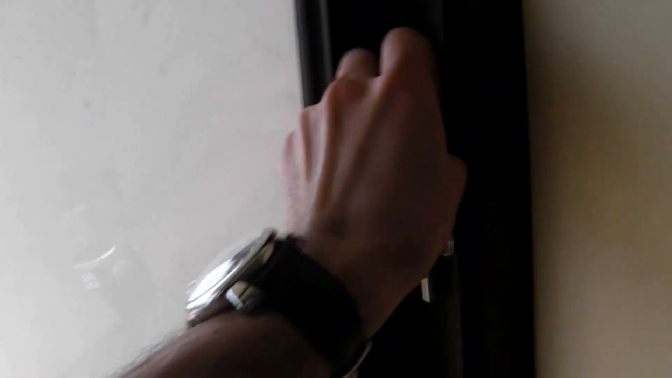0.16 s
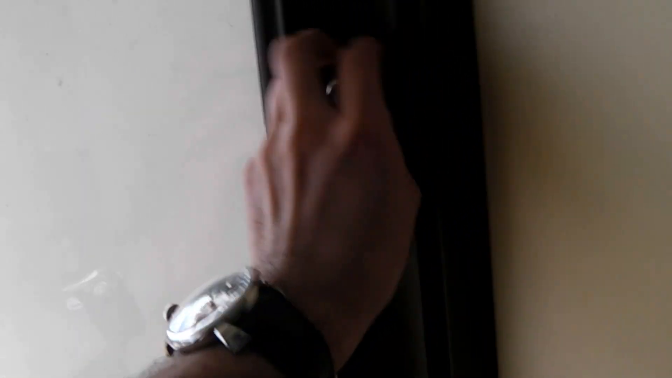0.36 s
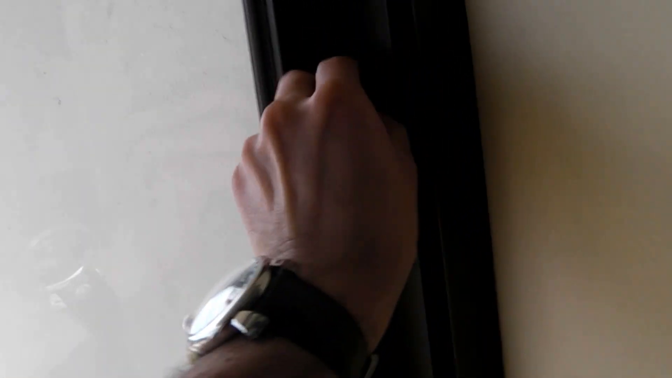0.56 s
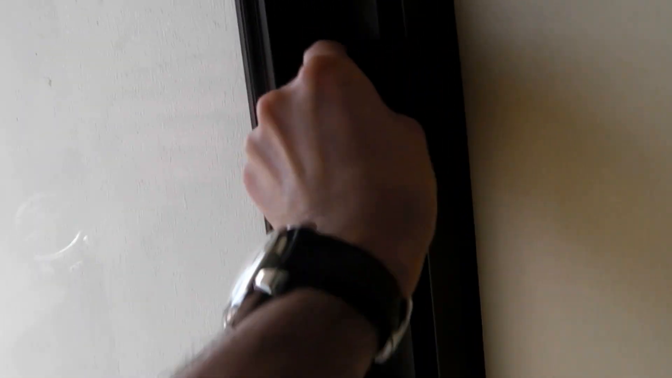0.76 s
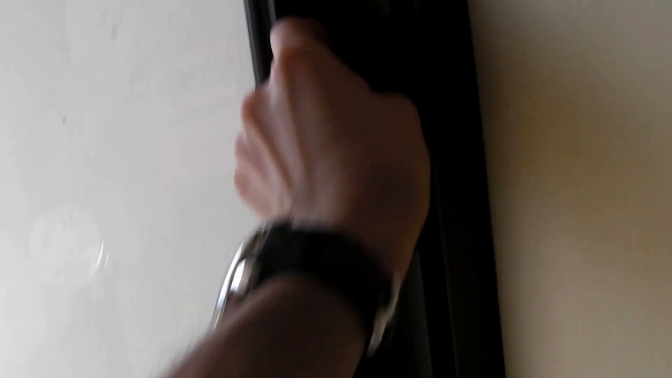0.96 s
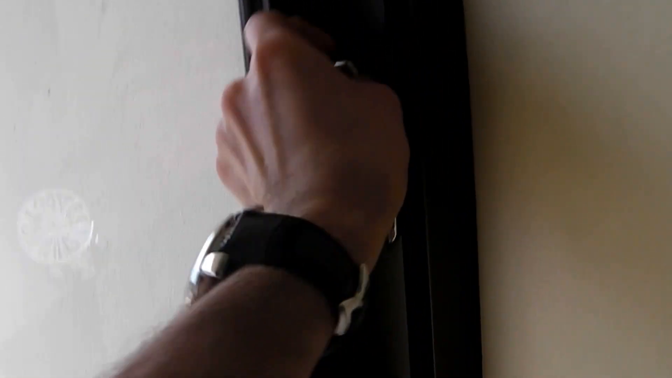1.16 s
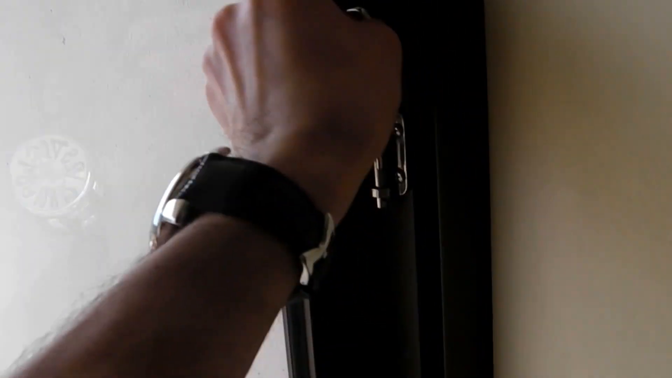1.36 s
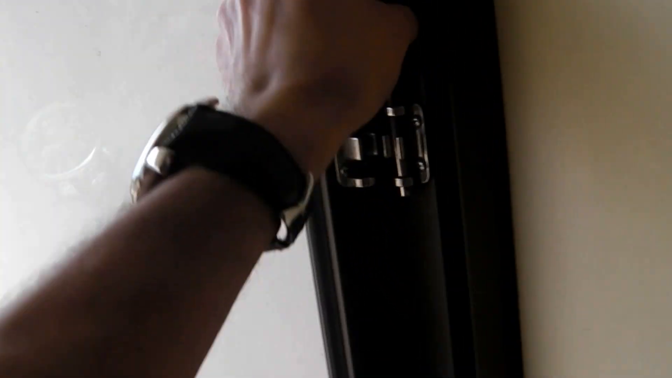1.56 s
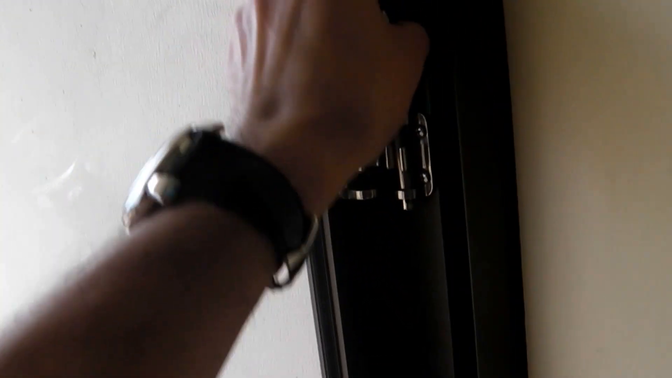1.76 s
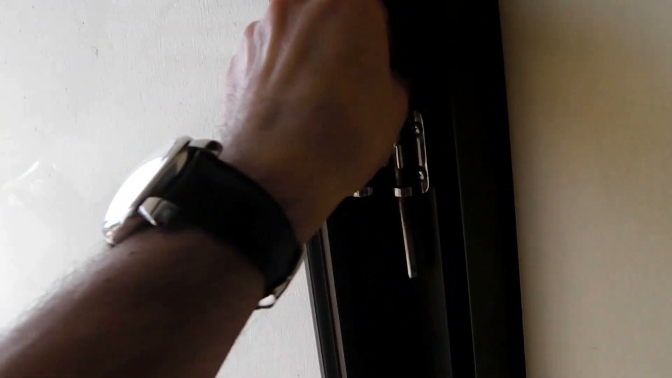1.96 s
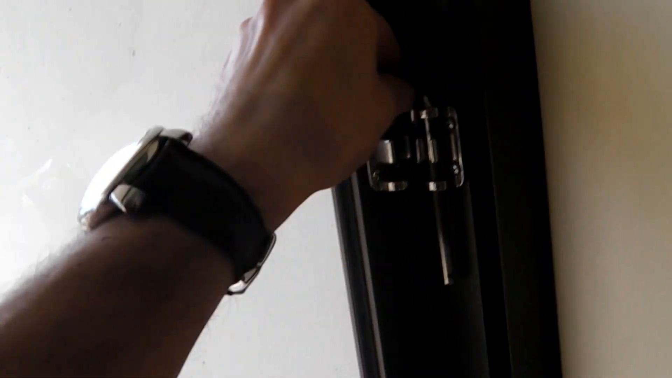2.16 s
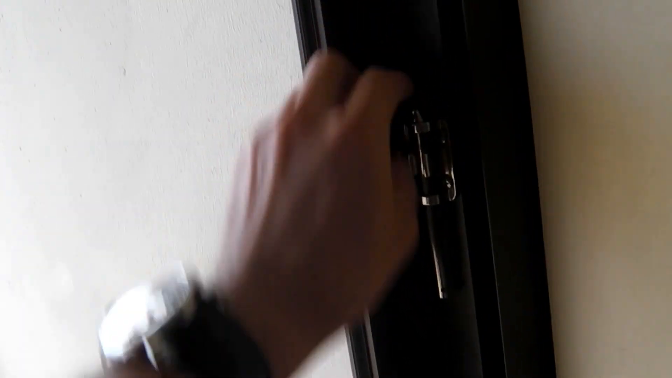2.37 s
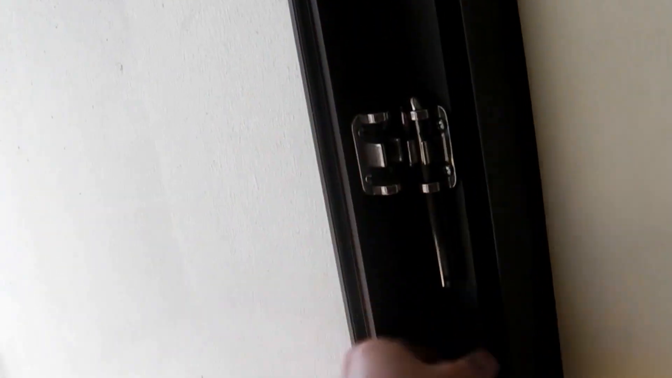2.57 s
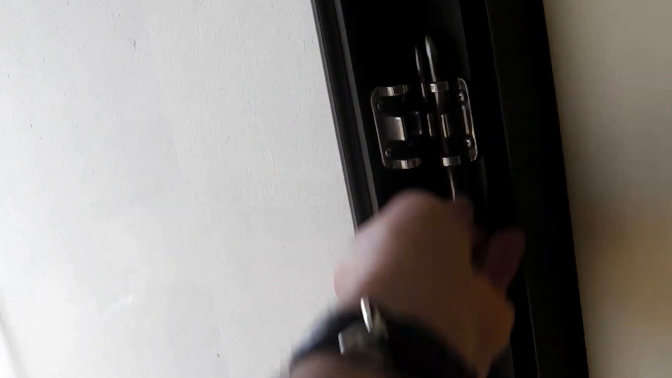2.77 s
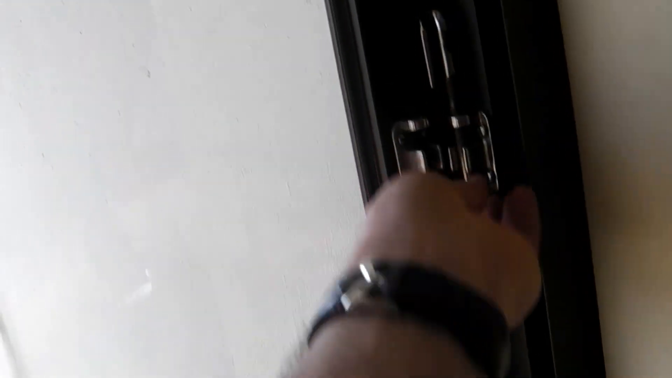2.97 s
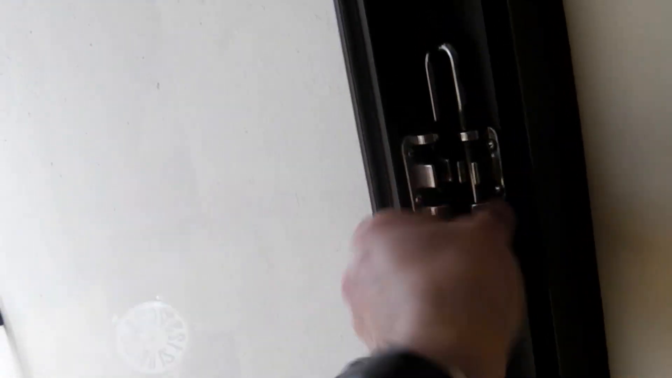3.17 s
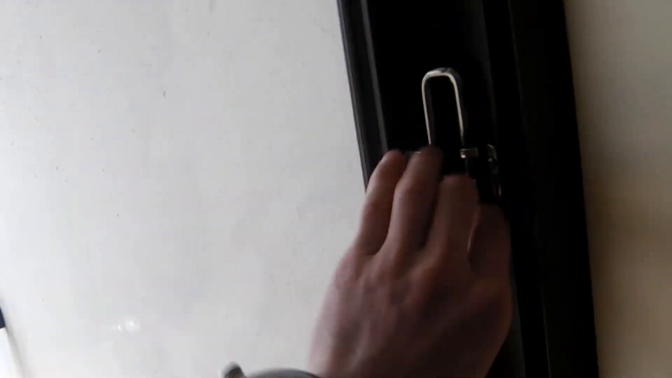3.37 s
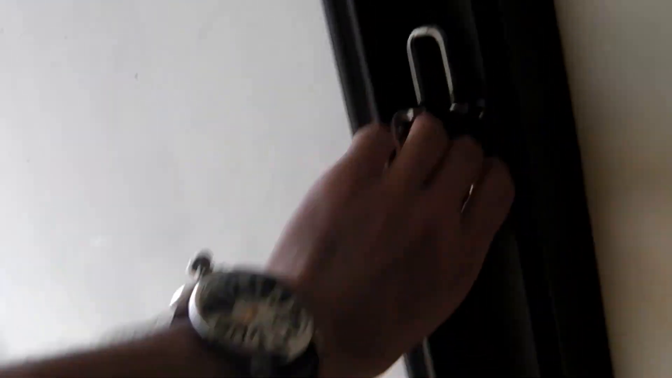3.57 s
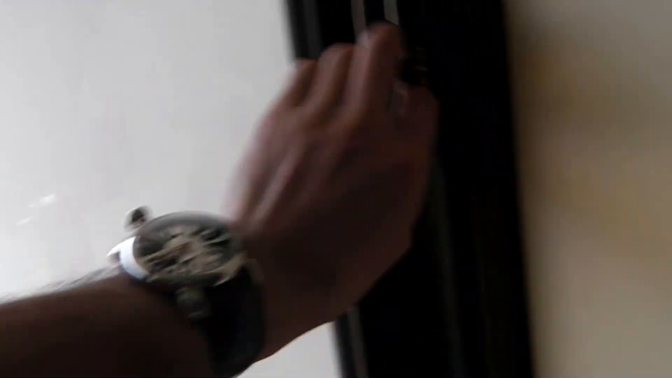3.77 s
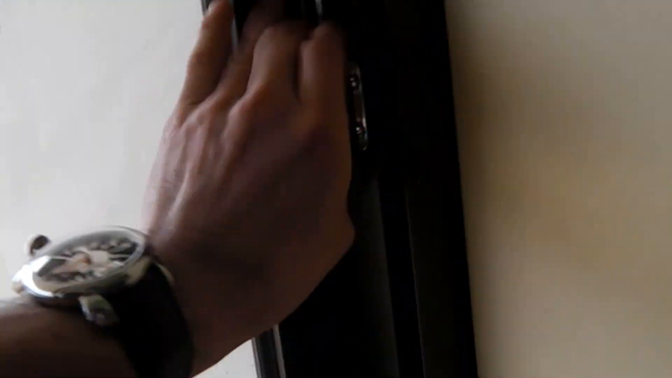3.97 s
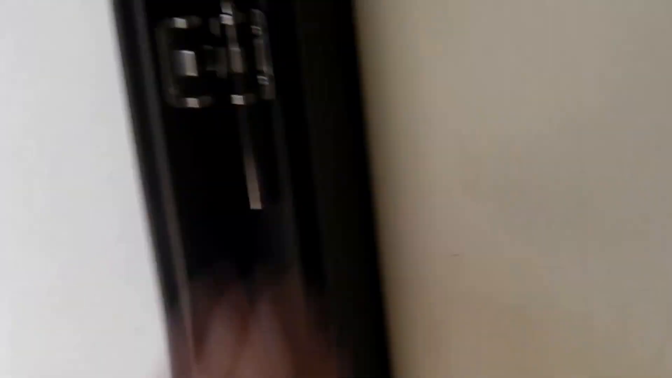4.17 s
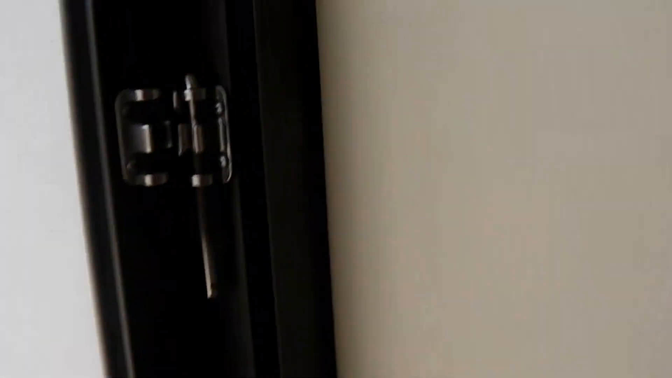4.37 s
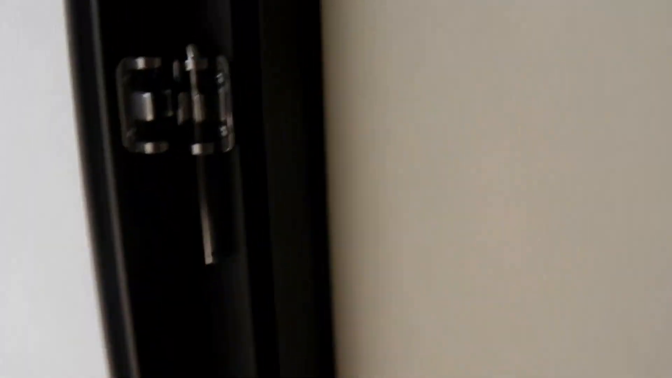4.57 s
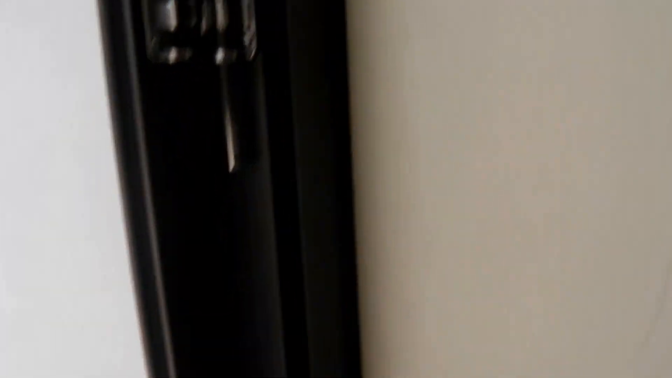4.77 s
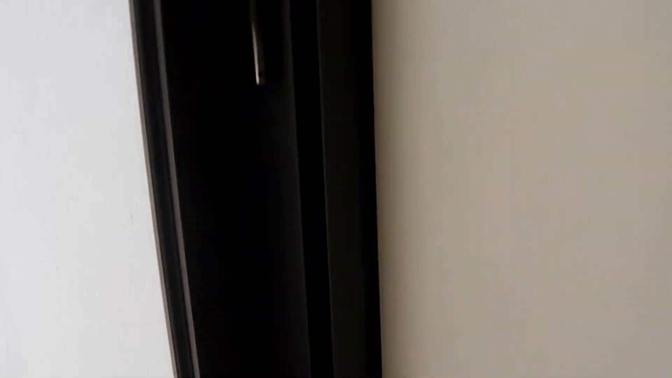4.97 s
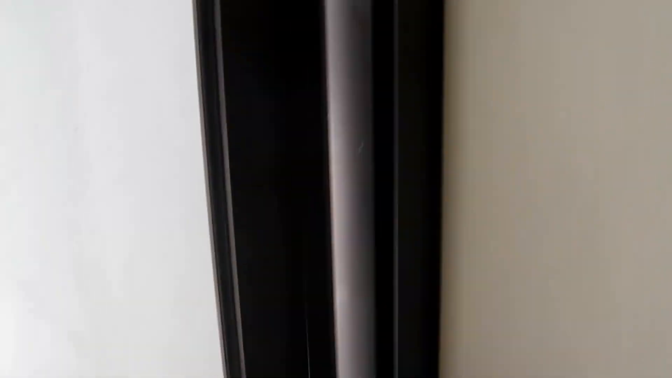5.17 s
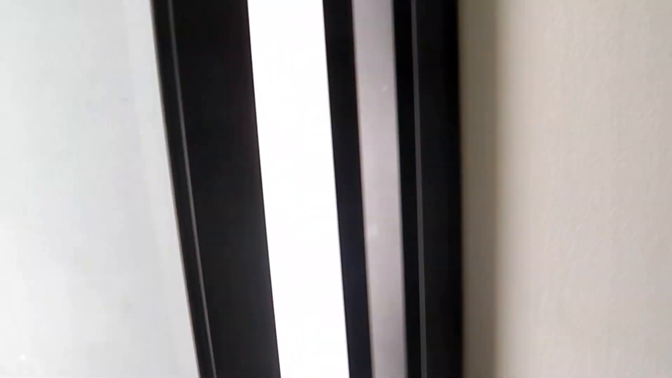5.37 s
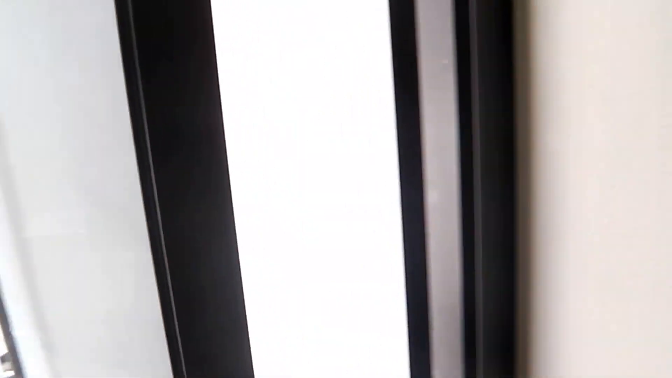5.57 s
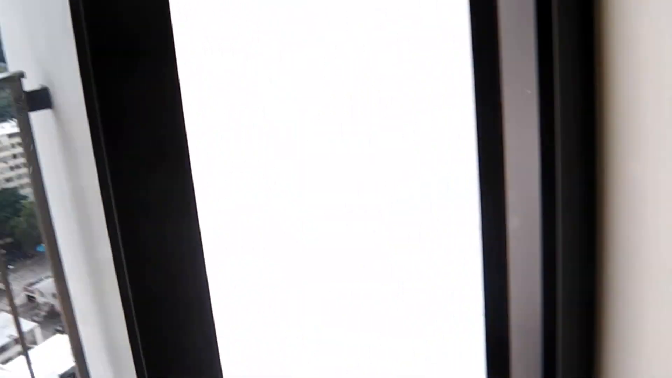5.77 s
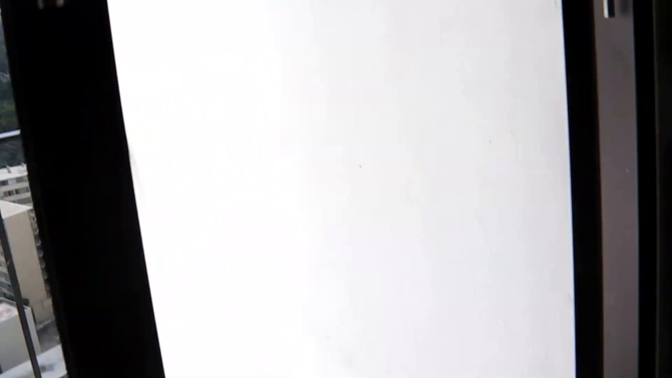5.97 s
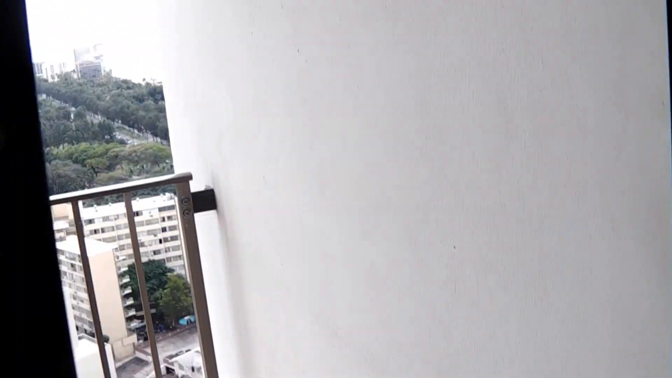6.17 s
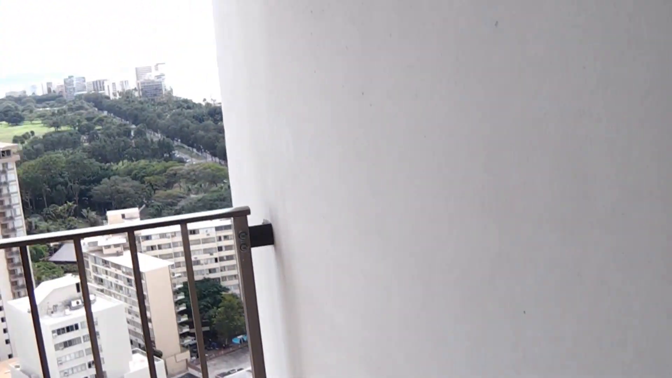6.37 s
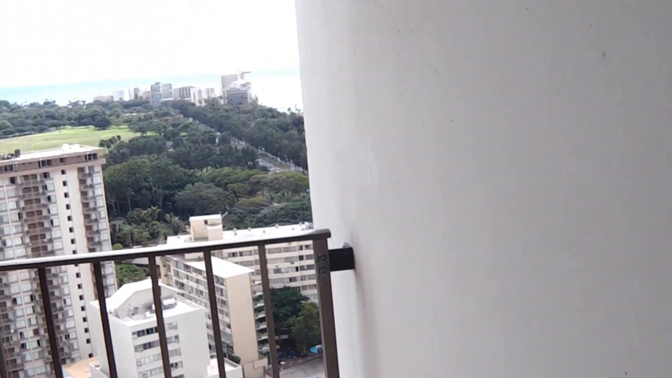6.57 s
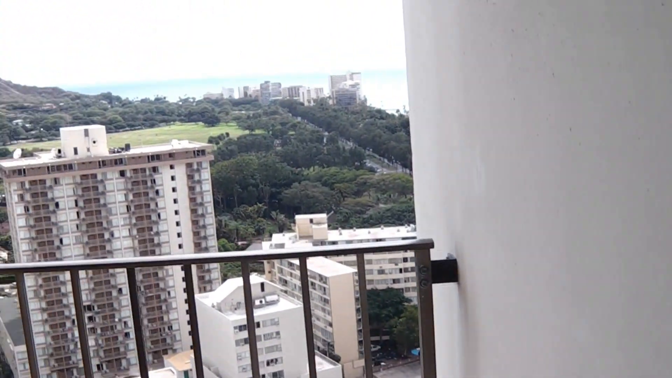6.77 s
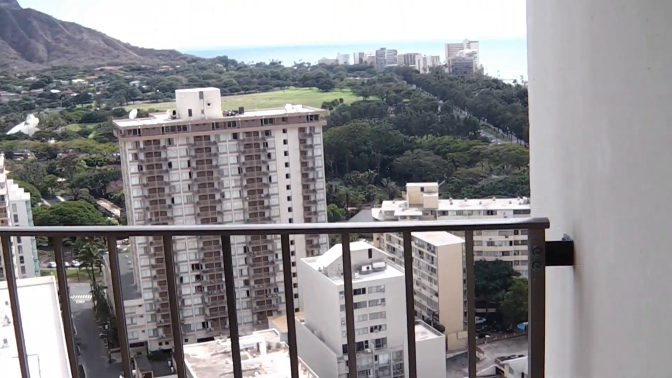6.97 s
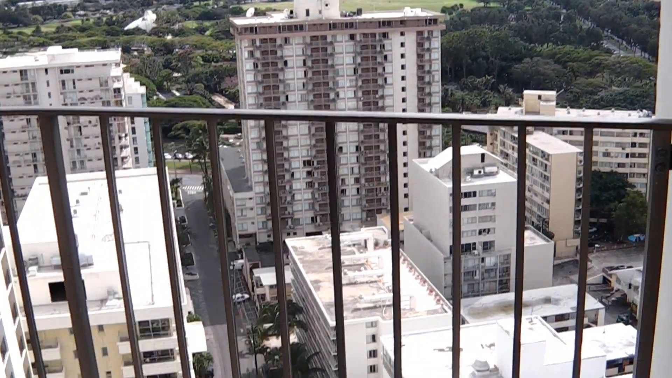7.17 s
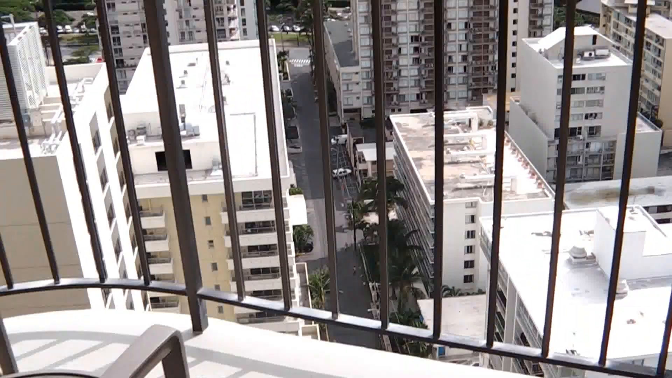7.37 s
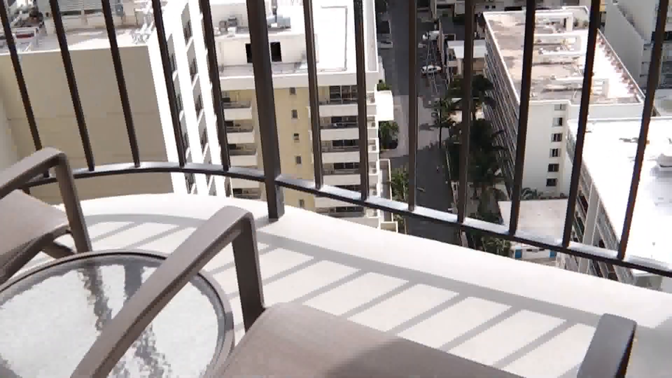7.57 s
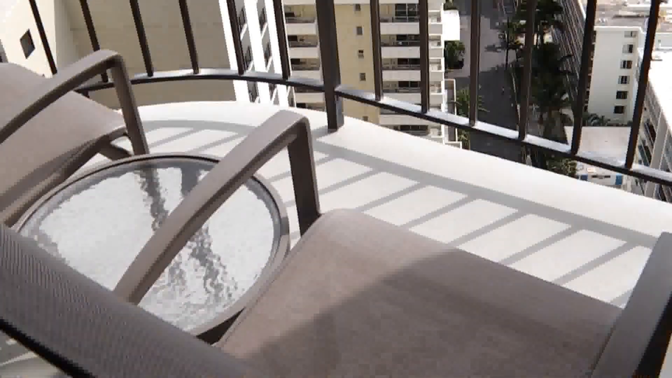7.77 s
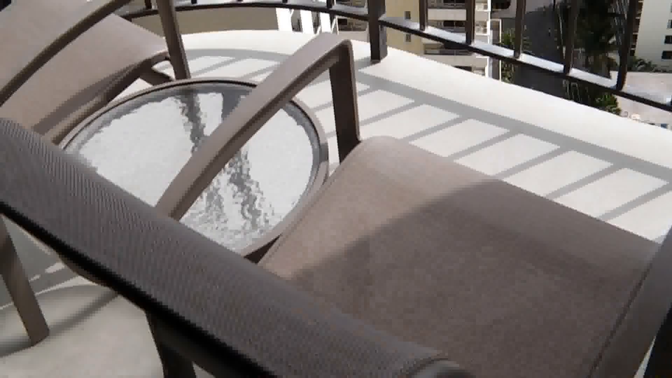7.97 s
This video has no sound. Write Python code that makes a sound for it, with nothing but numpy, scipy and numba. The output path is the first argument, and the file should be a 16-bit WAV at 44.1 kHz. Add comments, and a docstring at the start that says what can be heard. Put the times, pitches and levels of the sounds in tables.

```python
"""Sliding door unlocked and opened

A hand turns the lock of an aluminium sliding door and flips its steel swing guard, close to the microphone.
Each blow is chattering noise, decaying metal modes and a frame thud, over the sine orders of a far engine.
The seal lets go, the door hisses open as fluttering noise, and the wind and roar of the town come in as
coloured noise. The gain ducks after the loudest clacks."""
import sys
import numpy as np
from scipy import signal
from scipy.fft import irfft, next_fast_len
from scipy.io import wavfile
from scipy.ndimage import uniform_filter1d
from numba import njit

SR = 44100
rng = np.random.default_rng(int(sys.argv[2]) if len(sys.argv) > 2 else 0)


def materialize(psi):
    """Save the field psi as 16-bit PCM at rate SR to the path in sys.argv[1].

    A 1-D psi becomes a single channel; in a 2-D psi each row is a channel.
    """
    bounded = np.clip(np.atleast_2d(psi).T, -1, 1)
    quanta = np.round(bounded * 32767).astype(np.int16)
    wavfile.write(sys.argv[1], SR, quanta)


N = 353682
TIME = np.arange(N) / SR
SIDES = np.array([[1], [-1]])  # left, right

# Blows of lock parts. Each row: start in seconds, frame thud in dB, clack in dB, bright ring in dB,
# chatter decay (to 1/e) in ms, ring favoured by the place of contact in Hz.
LOCK_BLOWS = [(0.165, -40, -41, -46, 11, 2330), (0.305, -28.5, -43, -56, 7.3, 790),
              (0.349, -40, -40.5, -67, 5.8, 3200), (0.419, -41, -32, -50, 7.2, 2110),
              (0.426, -28, -14, -22, 5.6, 2700), (0.61, -18.5, -32.5, -40, 7.9, 1720),
              (0.854, -41, -43, -60, 8.8, 3160), (0.939, -27, -20, -31, 9, 2030),
              (0.9467, -25, -13.5, -9, 30, 2044), (0.96, -25, -2.5, -4, 8.4, 2030),
              (0.988, -14.5, -23, -34, 5, 800), (1.094, -15, -19, -21, 4.4, 1600),
              (1.124, -25, -33.5, -33, 4.6, 2270), (1.572, -23, -32.5, -42, 10, 1680),
              (1.999, -28, -26.5, -49, 52, 785), (2.026, -19, -21, -19, 24, 6400),
              (2.038, -15, -18.5, -7.5, 9.5, 11200), (2.088, -28, -27, -41.5, 11, 6370),
              (2.146, -36, -24.5, -24.5, 8.8, 3600), (2.271, -23, -19.5, -18, 5.1, 2120),
              (2.281, -19.5, -17.5, -20, 11.3, 2300)]
# Light metal snaps. Each row: start in seconds, thud, clack and ring in dB, chatter in ms, favoured ring in Hz.
METAL_SNAPS = [(1.631, -29.5, -25.5, -18.5, 8, 6500), (1.749, -25.5, -22, -3.5, 2.6, 7200),
               (2.195, -21.5, -16, -8, 12, 7150), (2.684, -25.5, -40.5, -31.5, 15, 5900),
               (2.803, -40, -57, -35, 7.9, 5900), (4.097, -13, -4.5, 5, 4.4, 6800),
               (4.208, -46, -20.5, -9.5, 4, 12000), (4.7375, -62, -19.5, -16, 3, 9600)]
# Swing guard. Each row: start in seconds, thud, clack and ring in dB, chatter in ms, favoured ring in Hz.
GUARD_BLOWS = [(2.107, -26, -28, -29, 5.4, 6440), (2.208, -42, -18, -11, 9.6, 9200),
               (2.836, -33, -38, -60, 4, 1910), (2.85, -28.5, -29, -30, 23, 9200),
               (2.91, -23.5, -18.5, -25, 13, 1970), (2.916, -30, -24.5, -22.5, 15, 9200),
               (2.953, -33, -5, -3, 4.5, 1900), (2.958, -14, -14, -5.5, 6, 6440),
               (2.9625, -9.5, -10.5, -16, 5.3, 7040), (3.18, -26.5, -24.5, -27.5, 8.8, 9250),
               (3.206, -34, -25.5, -43, 4.9, 2300), (3.2755, -23, -19, -24.5, 14, 5700),
               (3.3365, -33, -15, -10, 13, 9200), (3.349, -15.5, -14, -14.5, 5, 2000),
               (3.478, -19.5, -19.5, -32.5, 8.5, 2260), (3.627, -35.5, -37.5, -55, 4.7, 1910),
               (3.889, -30, -34, -47, 1.7, 845), (4.0085, -22.5, -13.5, -14, 8.1, 2460),
               (4.2532, -25, -21.5, -7.5, 5.7, 11750), (4.2815, -12, -2.5, 0, 7.2, 6360),
               (4.289, -31, -21, -16, 3.7, 6440)]
# Door. Each row: start in seconds, thud, clack and ring in dB, chatter in ms, favoured ring in Hz.
DOOR_KNOCKS = [(4.913, -35, -42, -49, 4.7, 740), (4.933, -40, -53, -38, 3.4, 10600),
               (4.978, -55, -47, -34, 4.4, 6400), (5.079, -15.5, -32, -33, 6.3, 740),
               (5.134, -16.5, -15, -11.5, 9.8, 740), (5.213, -59, -24, -22, 2, 1535)]

# Modes of the door frame. Each row: frequency in Hz, relative level in dB, T60 in seconds.
FRAME_MODES = [(371.3, -6, 0.12), (417, 8.5, 0.062), (455, 12.5, 0.045), (441.3, -6, .26),
               (500, -3.5, 0.081)]
# Modes of the lock. Each row: frequency in Hz, relative level in dB, T60 in seconds.
LOCK_MODES = [(780, 0.5, 0.022), (1790, -6, 0.048), (2060, 0.5, 0.025), (2205, -5, 0.033), (2360, -3, .04),
              (3250, -1, 0.036), (5350, -0.5, 0.037), (6000, -1, 0.057), (6240, 0, 0.08), (7430, 0, .05),
              (9300, -25, 0.15), (10900, 0.5, 0.062), (11360, -14, 0.054)]
# Modes of the light metal snaps. Each row: frequency in Hz, relative level in dB, T60 in seconds.
SNAP_MODES = [(1330, 0, 0.051), (5200, -11, 0.028), (5650, -6, 0.034), (5900, 0, 0.027), (6100, -9, .02),
              (6616, -7, 0.017), (7210, 5.5, 0.026), (7160, 3, .022), (7400, -11, 0.017), (7580, 1, 0.013),
              (8700, -3, 0.025), (9400, -10, .02), (11400, 8, 0.015), (11000, 11, 0.013),
              (11400, -2, 0.015), (12100, 9, .015)]
# Modes of the swing guard. Each row: frequency in Hz, relative level in dB, T60 in seconds.
GUARD_MODES = [(848, 6, 0.016), (1020, -16, 0.11), (1897, -3.5, 0.062), (2106, 0.5, 0.03),
               (2240, -9, 0.075), (2730, -8, 0.069), (3050, -1, 0.071), (5510, 5.5, 0.055), (6330, -8, .05),
               (6480, 2, 0.061), (7160, -6, .06), (9180, 3.5, 0.052), (10940, 0, 0.039), (10900, 9, 0.048),
               (11700, 7, 0.04)]
# Modes of the door. Each row: frequency in Hz, relative level in dB, T60 in seconds.
DOOR_MODES = [(594, -5, .05), (730, -8, 0.038), (1010, -4.5, 0.1), (1560, 2, 0.058), (2330, 6, 0.045),
              (3220, 9, .04)]

# Spectrum of metal contact. Each row: frequency in Hz, relative density in dB per Hz.
CONTACT_SPECTRUM = [(500, 6.5), (900, -3), (1300, -4), (2200, -1.5), (3200, -4), (4500, -6.5), (6000, 2),
                    (9000, -3.5), (11500, -1), (13500, -11), (16000, -34)]
# Spectrum of the room rumble. Each row: frequency in Hz, relative density in dB per Hz.
INDOOR_SPECTRUM = [(25, -12), (45, -10.5), (70, -0.5), (110, -3.5), (175, -8.5), (270, -21.5), (380, -15),
                   (650, -29), (1100, -25.5), (1600, -31.5), (5000, -37.5), (11000, -37.5), (16000, -41.5)]
# Spectrum of the rubbing gasket. Each row: frequency in Hz, relative density in dB per Hz.
RUB_SPECTRUM = [(600, -44), (1400, -3), (2150, -11), (2380, 4), (2750, -3), (3400, 4), (3900, -9),
                (5750, -8), (9000, -6.5), (9700, -6), (10400, -13), (11400, -9), (16000, -32)]
# Spectrum of the dragging seal. Each row: frequency in Hz, relative density in dB per Hz.
SEAL_SPECTRUM = [(200, -25), (400, -12), (900, -5.5), (1600, 1.5), (2400, -1), (4300, 0.5), (7000, -0.5),
                 (11500, 0), (14000, -17), (16000, -30)]
# Spectrum of the door on its track. Each row: frequency in Hz, relative density in dB per Hz.
GLIDE_SPECTRUM = [(900, -6.5), (1600, -4), (2600, -1), (4000, -3.5), (5800, -2.5), (7000, 1.5), (9500, -1),
                  (12000, -1), (14000, -13), (16000, -32)]
# Spectrum of the seal's high sheen. Each row: frequency in Hz, relative density in dB per Hz.
SHEEN_SPECTRUM = [(6000, -39), (8300, 0.5), (9500, 10.5), (10300, -3), (12400, 3.5), (14000, -22),
                  (16000, -41)]
# Spectrum of the town. Each row: frequency in Hz, relative density in dB per Hz.
TOWN_SPECTRUM = [(25, -14), (60, -1), (90, 1), (150, -3), (220, -8.5), (285, -15.5), (390, -0.5),
                 (560, -10.5), (850, -9), (1500, -15), (3000, -23.5), (7000, -29), (12000, -37.5),
                 (16000, -57)]
# Spectra of the hollow resonance, skin on metal and wind. Each row: frequency in Hz, density in dB per Hz.
HOLLOW_SPECTRUM = [(290, -32), (380, 5.5), (450, -7.0), (600, -8.5), (2000, -41), (16000, -88.0)]
SKIN_SPECTRUM = [(400, 6.5), (1200, -8.5), (4700, -13), (5550, 4.0), (6400, -12), (7200, -3.0),
                 (8800, -11), (11500, -6.0), (16000, -26.5)]
WIND_SPECTRUM = [(22, -18), (50, -5), (90, 1.0), (160, -12), (600, -60), (16000, -110)]

# The engine's drone swells and sinks. Each row: time in seconds, level in dB.
ENGINE_LEVEL = [(0, -47.5), (.4, -33.5), (.6, -39), (.9, -30.5), (1.15, -46), (1.6, -35.5), (2.08, -44.5),
                (2.3, -26.5), (2.5, -37.5), (2.85, -30), (3.1, -47), (3.5, -45), (3.68, -33.5),
                (4.05, -37.5), (4.3, -55)]
# The engine speeds up from idle, then runs down. Each row: time in seconds, firing rate in Hz.
ENGINE_HZ = [(0, 69.8), (.45, 74.8), (.9, 77.8), (2.0, 86.5), (2.35, 82.9), (2.8, 77.8), (3.1, 73.9),
             (3.35, 71.9), (4.05, 71.06), (4.6, 66.8)]
# Engine orders from the second up. Each entry: level in dB before the room's lift.
OVERTONES_DB = [-53, -60.5]
# Room resonances that lift passing overtones. Each row: centre in Hz, width in Hz, lift in dB.
BOOMS = [(149.5, 7.1, 12), (215, 5, 16.5)]
# Finger strokes on the metal. Each row: start of the hold in seconds, level in dB, hold in seconds.
STROKES = [(0.068, -37.5, 0.013), (0.242, -37, 0.028), (.45, -45.5, 0.094), (1.14, -43.5, 0.089),
           (1.735, -35, 0.029), (1.972, -37, .05), (2.095, -35, 0.18), (2.75, -38.5, 0.15),
           (3.097, -47, 0.082)]
# Parts scrape as they are forced or let go. Each row: peak in seconds, level in dB,
# attack and release in seconds per 20 dB.
SCRAPES = [(0.945, -20, 0.022, .005), (1.99, -28.5, 0.028, 0.06), (2.948, -20.5, 0.09, 0.014),
           (3.0, -35, .02, 0.14), (3.172, -37, 0.026, .06), (3.33, -28, .02, 0.022), (3.4, -32, .02, 0.055),
           (3.477, -33, .008, .01), (4.005, -29, 0.019, 0.16), (4.095, -21, .008, .005),
           (4.226, -15, .019, .08)]
# The guard's loose hoop or the lock's lever is jolted. Each row: start in seconds, level in dB, pitch in Hz.
PINGS = [(2.06, -34, 9207), (2.146, -32, 9207), (2.146, -27, 2040), (2.208, -20.5, 9207),
         (2.684, -38, 9207), (2.85, -28, 9207), (2.916, -28, 9207), (3.3365, -21, 9150),
         (4.2545, -25, 9207), (4.274, -25, 9207)]
# Low thumps of the pane and of wind. Each row: start in seconds, level in dB, band in Hz,
# decay (to 1/e) in seconds.
THUMPS = [(2.118, -27.5, 122, 0.051), (4.913, -28, 260, .014), (5.082, -21.5, 180, 0.034),
          (5.134, -26, 104, 0.045), (5.133, -14.5, 720, 0.013), (7.698, -11, 82, 0.013)]
# The door is tugged and slips. Each row: start of the hold in seconds, level in dB, hold in seconds.
TUGS = [(4.699, -23, 0.045), (5.2, -18.5, .012)]
# Gusts on the microphone. Each row: peak in seconds, level in dB.
GUSTS = [(5.15, -34), (6.2, -32.5), (6.65, -40), (7.6, -45.5)]
# Surges of sheen at full speed. Each row: start of the hold in seconds, level in dB, hold in seconds.
SURGES = [(6.03, -30.5, 0.23), (6.41, -32, 0.038)]

# attacks and releases: time for 20 dB
STROKE_ATTACK_S, STROKE_RELEASE_S = 0.049, 0.087
TUG_ATTACK_S, TUG_RELEASE_S = 0.013, 0.015
GUST_ATTACK_S, GUST_RELEASE_S = 0.38, 0.75
SURGE_ATTACK_S, SURGE_RELEASE_S = 0.54, 0.049
PING_T60_S = 0.094
# the brush seal drags out of the jamb ever harder, then comes free
SEAL_S, SEAL_DB, SEAL_ATTACK_S, SEAL_HOLD_S, SEAL_RELEASE_S = 5.05, -20, 0.16, 0.157, 0.012
# the door gets up to speed, runs and coasts to rest
RUN_S, RUN_DB, RUN_ATTACK_S, RUN_HOLD_S, RUN_RELEASE_S = 5.49, -29, 0.54, 0.8, 0.85
# the town comes in as the gap widens, and grows as the microphone is carried out
GAP_S, OPENING_S, AJAR_SHARE, AJAR_ATTACK_S = 4.96, 1.25, 0.3, 0.28
TOWN_DB, STEP_OUT_DB_PER_S = -33, 1.5
INDOOR_WANDER_DB, TOWN_WANDER_DB, WIND_WANDER_DB = 1.3, 1.1, 2.6
ROOM_T60_S, ROOM_DB = 0.46, -14.5
NOTCH_HZ, TOP_HZ = 7860, 15900


def undb(db):
    """Decibels to gain."""
    return 10 ** (np.asarray(db) / 20)


def unit(x):
    """Scale to rms 1."""
    return x / np.sqrt(np.mean(x ** 2))


def walk(rate_hz):
    """Smooth random wander with a spread near 1."""
    k = max(int(SR / rate_hz), 1)
    steps = np.repeat(rng.standard_normal(N // k + 1), k)
    return 1.06 * uniform_filter1d(uniform_filter1d(steps, k), k)[:N]


def butter(x, hz, kind, order=3):
    """Causal low-, high- or band-pass."""
    return signal.sosfilt(signal.butter(order, hz, kind, fs=SR, output="sos"), x)


def noise(spectrum, wide_hz=9000, bass_side=0.22):
    """Stereo noise of a given colour, rms 1; the two sides agree less towards the treble."""
    size = next_fast_len(N, real=True)
    f = np.fft.rfftfreq(size, 1 / SR) + 1
    hz, db = np.transpose(spectrum)
    gain = undb(np.interp(np.log(f), np.log(hz), db)) * np.minimum(f / hz[0], 1) ** 2
    side = np.minimum(bass_side + .5 * f / wide_hz, .7)
    a, b = rng.standard_normal((2, len(f))) + 1j * rng.standard_normal((2, len(f)))
    return unit(irfft(gain * (a + side * b * SIDES), size)[:, :N])


def add(out, s, sound):
    """Mix a sound in at a time."""
    i = int(s * SR)
    out[:, i:i + sound.shape[1]] += sound[:, :N - i]


def envelope(s, db, attack_s, release_s, hold_s=0):
    """Gain that reaches its level at time s, holds and falls; attack and release are the times for 20 dB."""
    early = np.maximum(s - TIME, 0)
    late = np.maximum(TIME - s - hold_s, 0)
    return undb(db - np.minimum(20 * (early / attack_s + late / release_s), 200))


def slips(rate_hz, spread_db, decay_s):
    """Stick-slip envelope, rms 1: sudden releases of uneven size that die within a few ms."""
    kicks = (rng.random(N) < rate_hz / SR) * undb(spread_db * rng.standard_normal(N))
    return unit(signal.lfilter([1], [1, -np.exp(-1 / (decay_s * SR))], kicks))


def friction(spectrum, gain, rough_db, grain_hz):
    """Hiss of countless tiny slips, whose strength flutters."""
    return unit(noise(spectrum) * undb(rough_db * walk(grain_hz))) * gain


def ring(modes, t, favoured_hz=1, favour_db=9, scatter_db=4.0, spread_hz=11000):
    """Decaying modes; the place of contact favours some, and high ones reach the sides out of step."""
    hz, db, t60_s = np.transpose(modes)[:, :, None]
    size, detune, phase, lag = rng.standard_normal((4, len(modes), 1))
    favour = np.exp(-(np.log(hz / favoured_hz) / 0.096) ** 2)
    db = db + scatter_db * size + favour_db * favour
    start = np.pi * phase * (hz > 1000)
    lead = SIDES[:, :, None] * lag * hz / spread_hz
    swing = np.sin(2 * np.pi * hz * (1 + 0.0014 * detune) * t + start + lead)
    return np.sum(undb(db) * np.exp(-np.log(1000) * t / t60_s) * swing, axis=1)


def blows(rows, modes, ring_db, rattle_db, rattle_s, swell_s=0.0051, favour_db=9, crack_db=-2, crack_s=0.00027):
    """Metal cracks, chatters for a few ms, rings in its modes and thuds in the frame; loose parts rattle on."""
    out = np.zeros((2, N))
    grit = noise(CONTACT_SPECTRUM) * undb(2.7 * walk(700))
    t = np.arange(SR // 6) / SR
    onset = SR // 125  # levels hold for the first 8 ms
    for s, thud_db, clack_db, bright_db, chatter_ms, favoured_hz in rows:
        i = int(s * SR)
        chatter = np.exp(-1000 * t / max(chatter_ms, 1))
        rattle = undb(rattle_db) * np.exp(-t / rattle_s)
        crack = undb(crack_db) * np.exp(-t / crack_s)
        contact = grit[:, i:i + len(t)] * (chatter + rattle + crack)
        metal = contact + undb(ring_db) * ring(modes, t, favoured_hz, favour_db)
        # the heavy frame takes a few cycles to get going
        swell = 1 - np.exp(-(t / swell_s) ** 2)
        thud = ring(FRAME_MODES, t, scatter_db=3) * swell * undb(-.8 * SIDES)
        clack = butter(metal, [600, 4500], "bandpass")
        bright = butter(metal, 4500, "highpass")
        for part, db in ((thud, thud_db), (clack, clack_db), (bright, bright_db)):
            add(out, s, part * undb(db) / np.std(part[:, :onset]))
    return out


def indoor_air():
    """Dull room rumble with a hollow resonance, both wandering slowly in level."""
    rumble = noise(INDOOR_SPECTRUM) * undb(-39.5 + INDOOR_WANDER_DB * walk(4.86))
    hollow = noise(HOLLOW_SPECTRUM) * undb(-48.4 + INDOOR_WANDER_DB * walk(3.8))
    return rumble + hollow


def engine():
    """A heavy engine far below revs once; only its lowest orders pass the glass, and the room booms with them."""
    hz = np.interp(TIME, *np.transpose(ENGINE_HZ))
    phase = 2 * np.pi * np.cumsum(hz * (1 + 0.0039 * walk(19))) / SR
    level_db = np.interp(TIME, *np.transpose(ENGINE_LEVEL)) + 2 * walk(9.18)
    drone = undb(level_db) * np.sin(phase)
    for order, order_db in enumerate(OVERTONES_DB, 2):
        lift_db = sum(db / (1 + (2 * (order * hz - centre) / width) ** 2) for centre, width, db in BOOMS)
        drone = drone + undb(order_db + lift_db + 2.9 * walk(5)) * np.sin(order * phase)
    fade = np.clip((5.05 - TIME) / 0.4, 0, 1)
    return np.sqrt(2) * drone * fade  # sqrt 2: levels are rms


def fingers():
    """Skin strokes the metal: friction hiss broken up by stick-slip."""
    touch = sum(envelope(s, db, STROKE_ATTACK_S, STROKE_RELEASE_S, hold) for s, db, hold in STROKES)
    hiss = friction(SKIN_SPECTRUM, touch, rough_db=4, grain_hz=93.6)
    return hiss * slips(rate_hz=870, spread_db=9.0, decay_s=0.0075)


def lock():
    """Lock parts strike and ring in the lock's modes."""
    return blows(LOCK_BLOWS, LOCK_MODES, ring_db=-12.0, rattle_db=-24, rattle_s=0.013, favour_db=6.5)


def scrapes():
    """Forced metal sticks and slips: contact noise under a train of uneven releases."""
    force = sum(envelope(*scrape) for scrape in SCRAPES)
    return noise(CONTACT_SPECTRUM) * force * slips(rate_hz=600, spread_db=6, decay_s=0.004)


def snaps():
    """Light metal snaps: short, bright, with brief ringing."""
    return blows(METAL_SNAPS, SNAP_MODES, ring_db=-11.5, rattle_db=-13, rattle_s=0.014, favour_db=7)


def pings():
    """Light jolts leave a loose part ringing on its own, in one mode."""
    out = np.zeros((2, N))
    t = np.arange(SR // 4) / SR
    for s, db, hz in PINGS:
        tone = ring([(hz, 0, PING_T60_S)], t)
        add(out, s, tone * undb(db) / np.std(tone[:, :SR // 125]))
    return out


def guard():
    """The steel swing guard strikes, rings and rattles on."""
    return blows(GUARD_BLOWS, GUARD_MODES, ring_db=-12.5, rattle_db=-12.5, rattle_s=0.029)


def thumps():
    """Short, low, noisy swings of air pressure."""
    out = np.zeros((2, N))
    t = np.arange(SR // 2) / SR
    for s, db, hz, decay_s in THUMPS:
        swing = unit(butter(rng.standard_normal(len(t)), [0.5 * hz, 1.2 * hz], "bandpass", order=2))
        add(out, s, undb(db) * (swing * np.exp(-t / decay_s))[None])
    return out


def gasket():
    """The tugged door sticks and slips on its gasket."""
    pull = sum(envelope(s, db, TUG_ATTACK_S, TUG_RELEASE_S, hold) for s, db, hold in TUGS)
    rub = friction(RUB_SPECTRUM, pull, rough_db=0, grain_hz=316.0)
    return rub * slips(rate_hz=950, spread_db=2.5, decay_s=0.0012)


def seal():
    """The brush seal drags with a growing hiss, then tears free."""
    drag = envelope(SEAL_S, SEAL_DB, SEAL_ATTACK_S, SEAL_RELEASE_S, SEAL_HOLD_S)
    return friction(SEAL_SPECTRUM, drag, rough_db=1.5, grain_hz=193)


def knocks():
    """The door knocks before and while the seal drags, ringing in its own modes."""
    return blows(DOOR_KNOCKS, DOOR_MODES, ring_db=-17, rattle_db=-22, rattle_s=0.014, swell_s=0.0017, favour_db=3)


def town():
    """Roar of the town: low coloured noise let in by the widening gap."""
    ajar = AJAR_SHARE * envelope(GAP_S, 0, AJAR_ATTACK_S, np.inf)
    gap = ajar + (1 - AJAR_SHARE) * np.clip((TIME - GAP_S) / OPENING_S, 0, 1)
    outside_db = TOWN_DB + STEP_OUT_DB_PER_S * np.maximum(TIME - GAP_S - OPENING_S, 0)
    return noise(TOWN_SPECTRUM) * gap * undb(outside_db + TOWN_WANDER_DB * walk(6) - .5 * SIDES)


def wind():
    """Gusts on the microphone: very low noise of wandering level."""
    gusts = sum(envelope(s, db, GUST_ATTACK_S, GUST_RELEASE_S) for s, db in GUSTS)
    return noise(WIND_SPECTRUM) * gusts * undb(WIND_WANDER_DB * walk(7))


def track():
    """The freed door hisses along its track."""
    run = envelope(RUN_S, RUN_DB, RUN_ATTACK_S, RUN_RELEASE_S, RUN_HOLD_S)
    freed = TIME > SEAL_S + SEAL_HOLD_S
    return friction(GLIDE_SPECTRUM, run * freed, rough_db=2.0, grain_hz=35.86)


def sheen():
    """At full speed the brush seal adds a high hiss, in surges."""
    full_speed = sum(envelope(s, db, SURGE_ATTACK_S, SURGE_RELEASE_S, hold) for s, db, hold in SURGES)
    return friction(SHEEN_SPECTRUM, full_speed, rough_db=4, grain_hz=21.95)


def room(x, treble_t60_s=0.35, delay_s=0.014, bass_cut_hz=750, crossover_hz=3000, treble_db=-4.5):
    """A small room; the treble of the tail dies first and its bass is thin."""
    t = np.arange(int(.7 * SR)) / SR
    common, apart = rng.standard_normal((2, len(t)))
    low = butter(common + 0.28 * apart * SIDES, crossover_hz, "lowpass")
    low = low * np.exp(-np.log(1000) * t / ROOM_T60_S)
    high = butter(common + 1.43 * apart * SIDES, crossover_hz, "highpass")
    high = high * np.exp(-np.log(1000) * t / treble_t60_s)
    tail = (butter(low, bass_cut_hz, "highpass", order=1) + undb(treble_db) * high) * (t > delay_s)
    tail = tail / np.sqrt(np.sum(tail[0] ** 2))
    return signal.fftconvolve(x.mean(axis=0)[None], tail, axes=1)[:, :N]


def scene():
    """Metal parts and door in the room, a little to the right, over the engine and the air."""
    metal = lock() + snaps() + guard() + fingers() + scrapes() + pings()
    door = knocks() + gasket() + seal() + track() + sheen()
    near = metal + door
    far = engine() + indoor_air() + town() + wind() + thumps()
    return (near + undb(ROOM_DB) * room(near)) * undb(-.9 * SIDES) + far * undb(-1.3 * SIDES)


@njit
def follow(x, rise, fall):
    """Envelope that climbs fast at peaks and sinks slowly."""
    out, e = np.empty(len(x)), 0.
    for i in range(len(x)):
        e += (x[i] - e) * (rise if x[i] > e else fall)
        out[i] = e
    return out


def record(dry, limit_db=-4.0, attack_s=0.0012, release_s=0.25):
    """The gain ducks after loud peaks, the rest clips; a narrow notch and a steep cut shape the treble."""
    peaks = follow(np.abs(dry).max(axis=0), 1 / (1 + attack_s * SR), 1 / (release_s * SR))
    ducked = dry / np.maximum(peaks / undb(limit_db), 1)
    clipped = np.clip(ducked, -1, 1)
    notched = signal.lfilter(*signal.iirnotch(NOTCH_HZ, 22, fs=SR), clipped)
    return signal.sosfilt(signal.ellip(8, .2, 70, TOP_HZ, fs=SR, output="sos"), notched)


dry = scene()
out = record(dry)
materialize(out)
```